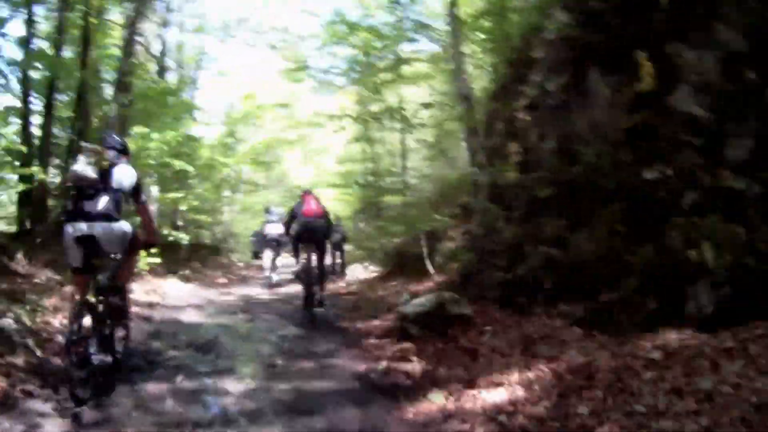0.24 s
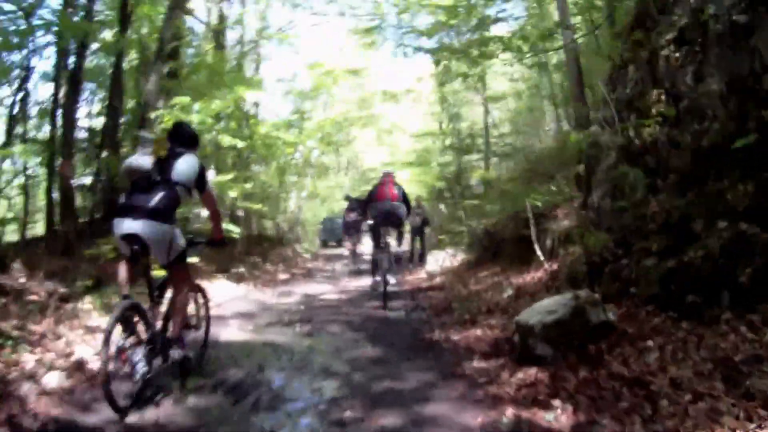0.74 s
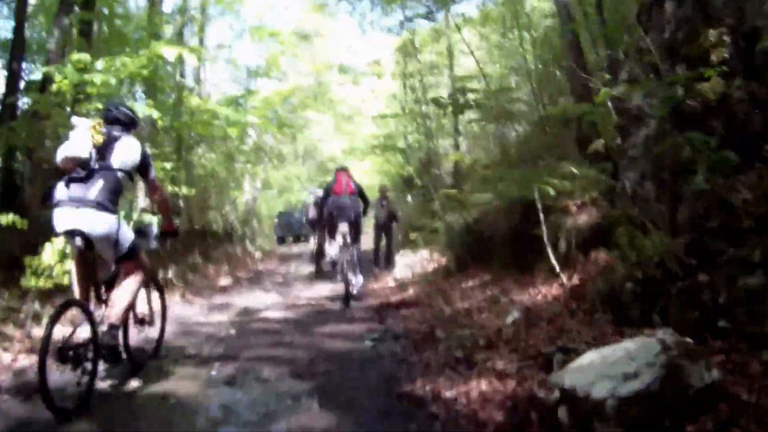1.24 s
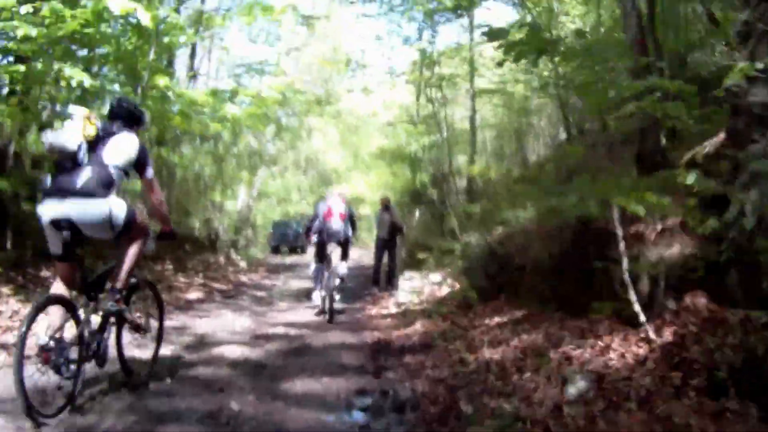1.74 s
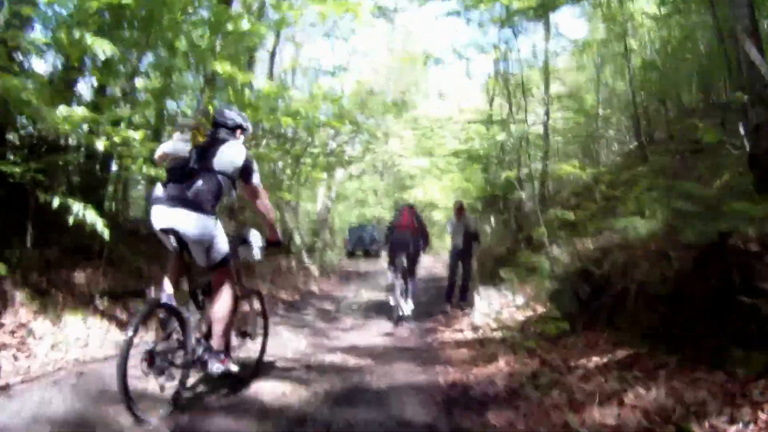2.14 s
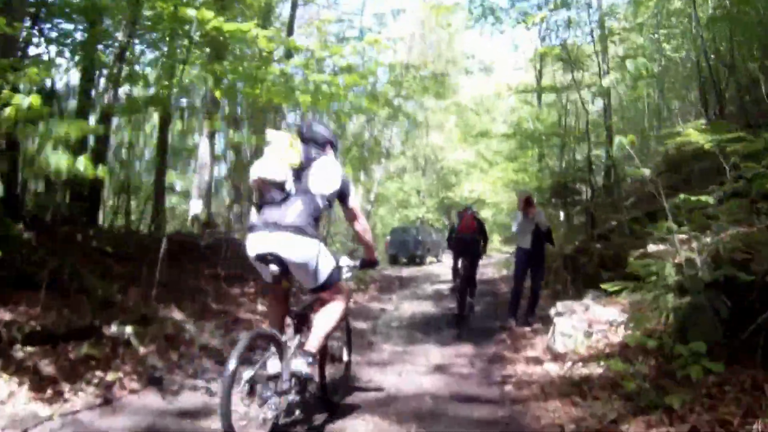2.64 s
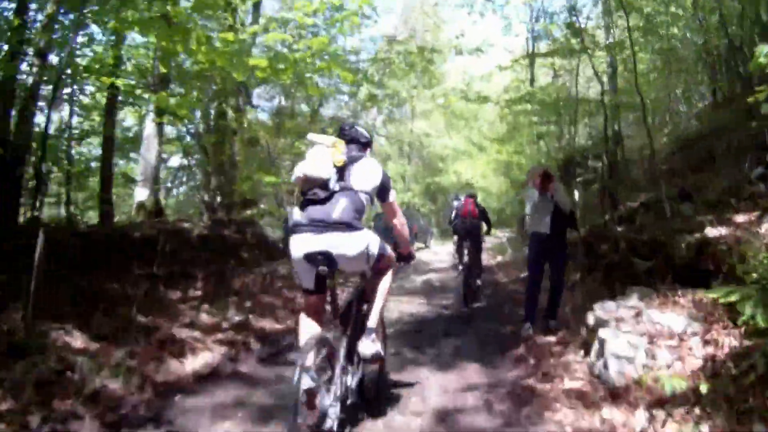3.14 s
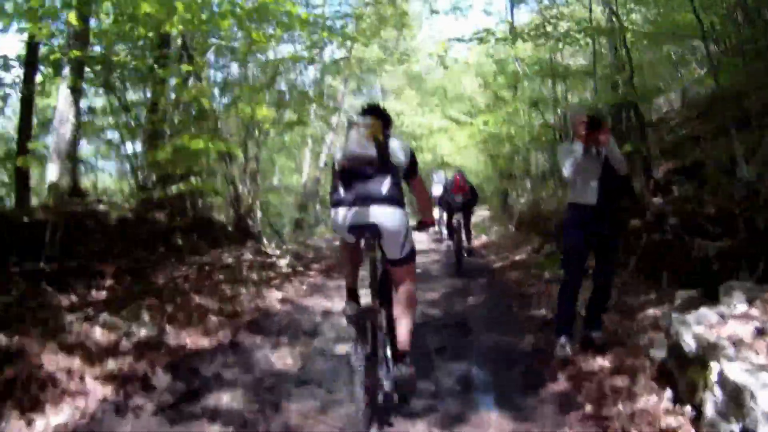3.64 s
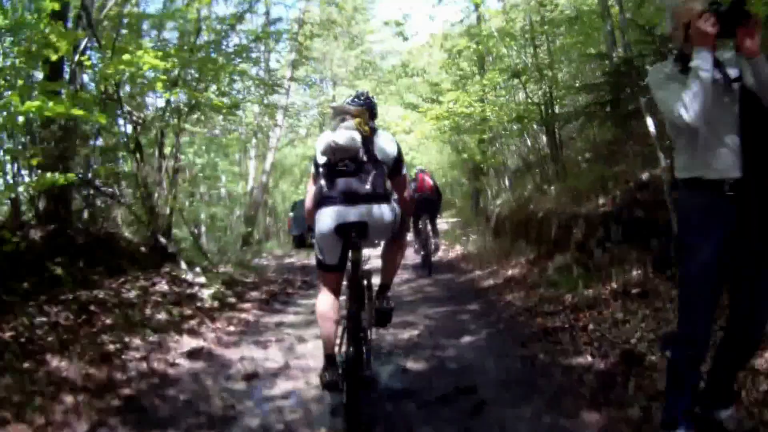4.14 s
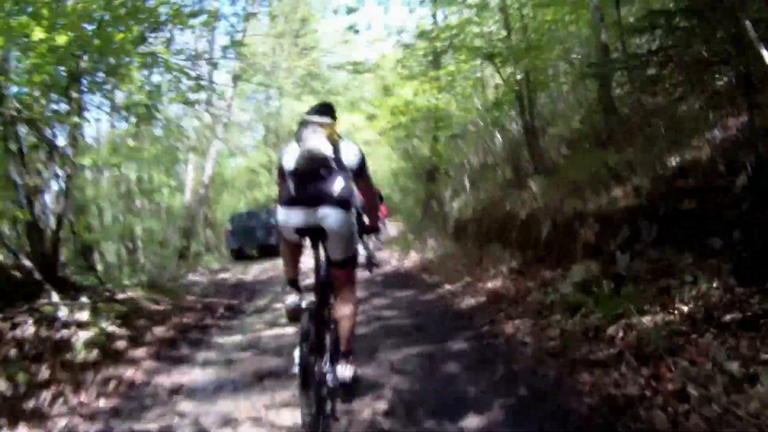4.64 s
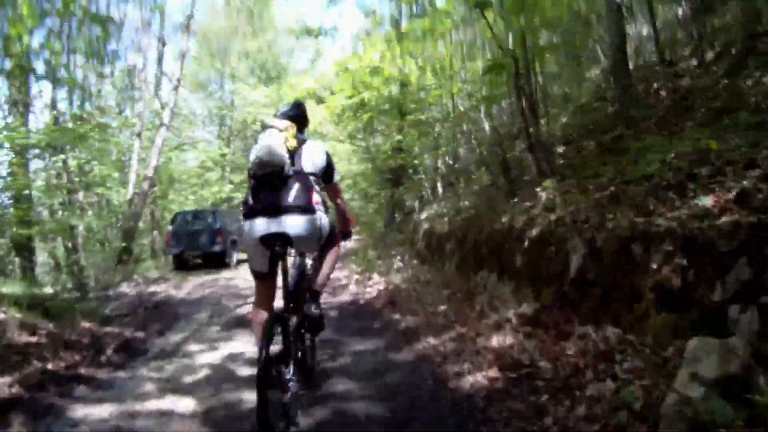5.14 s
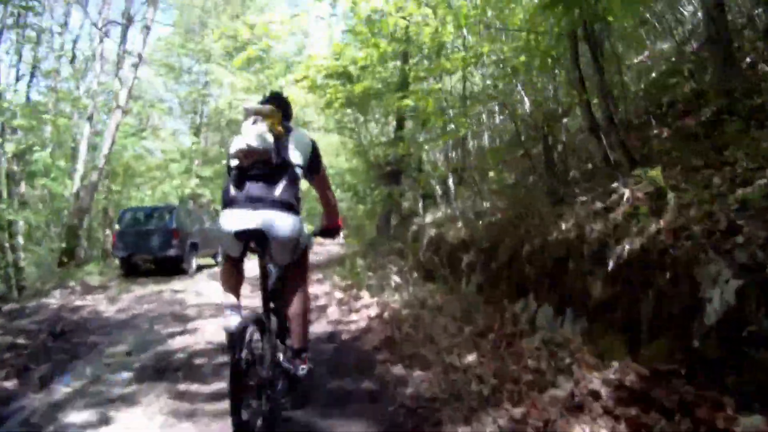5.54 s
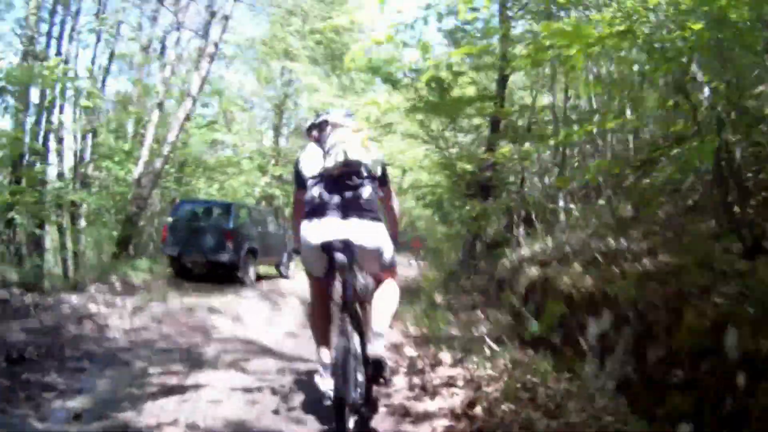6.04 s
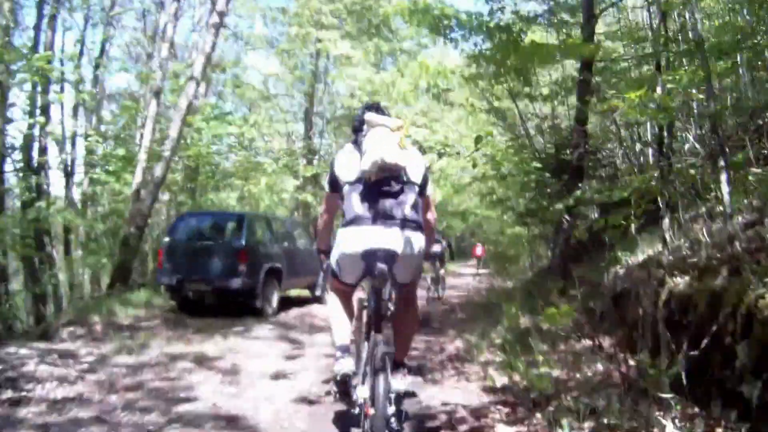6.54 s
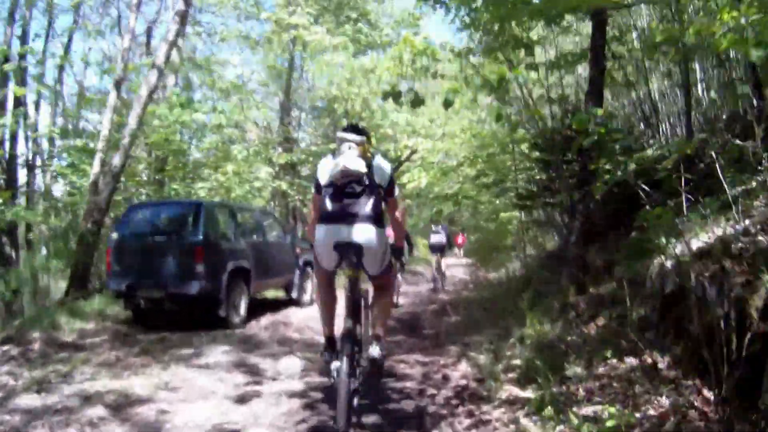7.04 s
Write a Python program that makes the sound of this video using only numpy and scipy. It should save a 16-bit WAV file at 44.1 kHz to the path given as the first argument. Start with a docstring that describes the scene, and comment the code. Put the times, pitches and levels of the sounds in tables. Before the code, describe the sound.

Hard plastic-like knocks and loose rattling from a mountain bike on a stony dirt track, tyres rushing beneath, with a brief late brake groan.

```python
"""Jolts knock and rattle a hard case around a small camera on a mountain bike on a stony forest track.
Each blow is a short burst that rings the case's decaying modes; hard ones add upper modes and a dry tick.
Filtered noise makes the tyre rush on dirt, the frame's low thrum and the air buffeting the case.
Late on, a disc brake groans on wavering partials and squeaks thinly; the loudest peaks clip."""
import sys
import numpy as np
from scipy import signal
from scipy.io import wavfile
from scipy.ndimage import uniform_filter1d

SR = 44100
rng = np.random.default_rng(int(sys.argv[2]) if len(sys.argv) > 2 else 0)


def persist_wave(psi):
    """Save psi, clipped to +-1, as 16-bit WAV."""
    counts = np.round(np.clip(psi, -1, 1) * 32767).astype(np.int16)
    wavfile.write(sys.argv[1], SR, np.atleast_2d(counts).T)


N = 321039
T = np.arange(N) / SR

# Clear knocks on the case, levels before the gains of each layer: (time [s], blow level [dB], pitch [Hz],
# upper modes against the blow [dB], dry tick against the blow [dB])
BLOWS = [(0.0056, -7.5, 1410, -33, -34), (0.0596, -9, 1490, -23, -36), (0.1515, -5, 1200, -27, -28),
         (0.172, -11, 1240, -27, -39.5), (0.2923, -3, 1210, -25, -40), (0.3596, -10, 1070, -27, -39),
         (0.3893, -6.5, 1270, -11, -14), (0.3973, -3.5, 1460, -23, -14), (0.4067, -2.5, 1310, -26, -17),
         (0.418, -9, 1460, -15, -36), (0.448, -15, 1470, 2.5, -29.5), (0.464, -10, 1520, -17, -30),
         (0.5561, -6, 1030, -14.5, -38), (0.5716, 1.5, 1370, -9, -8.5), (0.6063, -2, 1340, -18, -26),
         (0.6298, -5.5, 1440, -7, -34), (0.6484, -1.5, 1250, -8, -15), (0.66, -2.5, 1387, -13.5, -18),
         (0.6683, 2, 1410, -13, -17), (0.7148, -6, 1490, -3, -27), (0.7329, -1, 1360, -9.5, -14),
         (0.752, 1, 1285, -21, -17), (0.8795, -16.5, 1530, 2.5, -25), (0.9452, -10, 1161, -1, -8),
         (0.9595, -1.5, 1250, -18, -24), (1.0144, 2, 1400, -13, -38), (1.033, 2, 1310, -14.5, -10.5),
         (1.0759, 2, 1420, -21, -25), (1.0896, -4, 1480, -23, -18), (1.101, -8, 1429, -18, -28),
         (1.1105, -4, 1355, -15, -16), (1.3083, -9, 1342, -18, -36), (1.3147, -10.5, 1370, -19, -24),
         (1.3805, -2.5, 1530, -18, -42.5), (1.401, 0.5, 1212, -19, -20.5), (1.4878, -9, 1400, -21, -24),
         (1.514, -9, 1160, -31, -39), (1.6189, -2, 1540, -21, -20.5), (1.6863, -5.5, 1560, -30, -42),
         (1.7053, -13, 1200, -31, -37), (1.7266, -3, 1530, -23, -34), (1.794, -3.5, 1550, -34, -47),
         (1.8016, -13, 1250, -30, -34), (1.8088, -15, 1420, -16, -30), (1.8458, -11.5, 1840, -5.5, -13.5),
         (1.972, -14, 1000, -27, -32), (1.991, -10, 1230, -34, -41), (2.0046, -12, 1500, -29, -26),
         (2.0297, -6, 1230, -35, -41), (2.0415, -16, 1604, 5, -35), (2.139, -15.5, 1450, -1, -29),
         (2.237, -7, 1130, -33, -37), (2.267, -11, 1060, -28, -34), (2.3094, -5.5, 1218, -23.5, -21),
         (2.319, -4.5, 1420, -16, -17), (2.39, -3, 1140, -32, -40), (2.3995, -6.5, 1300, -23, -39),
         (2.4388, -10, 1256, -27, -28), (2.4481, -8, 1490, -19, -32), (2.4588, -9, 1240, -13, -22),
         (2.4921, -4.5, 1334, -29, -40), (2.6361, -8, 1020, -27, -36), (2.645, 0, 1180, -23, -43),
         (2.6608, -9, 1500, -10, -27), (2.694, -4, 1410, -7, -32), (2.7102, -3.5, 1588, -13, -26),
         (2.7562, -2.5, 1376, -18, -22), (2.7674, 1.5, 1201, -17.5, -15.5), (2.7772, -5.5, 1416, -21, -22),
         (2.8017, -3.5, 1350, -16.5, -18), (2.9386, -4.5, 1557, -31, -44), (3.0153, -6, 1540, -33, -40),
         (3.074, -3.5, 1340, -26, -34.5), (3.0871, -5.5, 1560, -15, -22.5), (3.0995, 1.5, 1210, -13, -15.5),
         (3.108, -9, 1500, -16, -29), (3.117, -8.5, 1480, -20, -27), (3.125, -3.5, 1280, -22, -22),
         (3.1451, -4, 1630, 2, -17), (3.1519, -4, 1680, -25, -36), (3.2075, -11.5, 1470, -3, -26),
         (3.2149, 2, 1540, -18, -15), (3.2294, -8, 1550, -15, -28), (3.2587, -11, 1043, -27, -34),
         (3.2925, 2, 1560, -28, -15.5), (3.3001, -12, 1464, -28, -34), (3.3605, -2.5, 1530, -29, -21),
         (3.424, 2, 1600, -33, -26), (3.4916, -13.5, 1460, 2, -22), (3.5455, -4, 1360, -9, -12),
         (3.5546, 2, 1310, -11.5, -16.5), (3.5658, 1, 1520, -7, -13), (3.5813, 1.5, 1130, -15.5, -19),
         (3.5906, -7, 1270, -27, -36), (3.602, 1, 1440, -4.5, -15), (3.6349, -7, 1189, -33, -38),
         (3.6477, -4.5, 1350, -19, -26.5), (3.6746, -2, 1340, -12.5, -12), (3.699, -1.5, 1375, -17, -17.5),
         (3.8558, -3.5, 1030, -31, -34), (3.8747, -3.5, 1410, -10.5, -12), (3.935, 2.5, 1450, -19, -12.5),
         (3.9985, -6, 1200, -5.5, -31), (4.0048, -1.5, 1379, -24, -38), (4.028, -4, 1310, -30, -23),
         (4.0414, 0, 1250, -32, -41), (4.052, -3, 1250, -33, -21), (4.0692, -2, 1340, -21, -16),
         (4.108, 2, 1570, -13, -12), (4.1855, -1.5, 1610, -3, -12), (4.196, -0.5, 1330, -23, -18),
         (4.2496, 2, 1560, -8, -15), (4.2837, -2.5, 1415, -21, -28), (4.2922, -2, 1330, -10, -15),
         (4.3199, -4, 1360, -12, -13), (4.3557, -2, 1166, -14, -20), (4.4619, 1, 1350, -17, -15),
         (4.5245, 2, 1510, -32, -12), (4.5644, 2, 1410, -15.5, -9), (4.5884, -0.5, 1460, -13, -16),
         (4.6127, 2, 1580, -14, -6), (4.682, 2, 1471, -17, -18.5), (4.7345, -5, 1560, -29, -32),
         (4.7476, -4, 1582, -42, -36), (4.8221, -2, 1470, -39, -33), (4.831, -3, 1110, -25, -30),
         (4.843, -4.5, 1370, -29, -22), (4.8684, 0, 1260, -12.5, -15), (4.8753, 0.5, 1340, -31, -24),
         (4.885, -6, 1320, -14, -29), (4.893, -3.5, 1332, -15, -15), (4.914, -0.5, 1723, -15, -16),
         (4.9251, 2, 1370, -13.5, -7), (4.974, -6, 1410, -1, -31), (5.0106, -1.5, 1440, -24, -24),
         (5.023, -3.5, 1310, -20, -14), (5.0315, -2.5, 1520, -15, -20), (5.0415, -6, 1250, -13, -37),
         (5.0712, -12.5, 1510, 2, -32), (5.188, -6, 1250, -26, -33), (5.2005, -7, 1040, -24, -32),
         (5.2107, -8, 1240, -30, -39), (5.2289, -2.5, 1370, -13, -35), (5.2362, -2, 1240, -20, -13.5),
         (5.2445, -0.5, 1240, -18, -18), (5.2584, -2, 1330, -10, -16), (5.2815, -3.5, 1420, -15, -26),
         (5.3102, -6, 1350, -18, -29), (5.3771, -7, 1300, -31, -35), (5.404, -2.5, 1810, -15, -18),
         (5.4149, -5, 1220, -27, -30.5), (5.4831, -2.5, 1540, -18, -34), (5.5574, -4.5, 1180, -33, -39),
         (5.568, -0.5, 1140, -37, -22), (5.5776, -4.5, 1230, -32, -39), (5.6181, -4.5, 1200, -34, -36),
         (5.71, -9, 1590, -32, -33), (5.7383, -11, 1290, -18, -31), (5.773, -7.5, 1260, -7, -32),
         (5.8114, -2, 1350, -20, -20), (5.8386, -12, 1290, -14, -28), (5.9388, -11.5, 1312, -5, -27),
         (5.9928, -9, 1180, -16, -34), (6.0062, -10, 1060, -27, -30), (6.0158, -11, 1270, -18, -29),
         (6.0334, -14.5, 1770, 3, -24), (6.0436, -9, 1404, -31, -31), (6.056, -8, 1290, -25, -35),
         (6.132, -17, 1811, 2.5, -24), (6.1474, -3.5, 1360, -14, -17), (6.2156, -4.5, 1500, -6, -20.5),
         (6.2559, -2.5, 1250, -23, -17), (6.392, -5, 1250, -32, -29), (6.4909, -4, 1380, -26, -37),
         (6.5187, -3, 1420, -29, -33), (6.5322, -2, 1410, -22, -24), (6.5418, -0.5, 1400, -14, -15),
         (6.5526, -3, 1300, -25, -18), (6.606, -6.5, 1280, -30, -28), (6.8082, -7, 1190, -20, -29),
         (6.8808, -9, 1300, -15, -28), (7.0114, -9, 1200, -22, -28), (7.1782, -1.5, 1720, -17, -28),
         (7.2367, -9, 1370, -4, -30), (7.2785, -6.5, 1230, -18, -26.5)]
# Roughness of the track, before layer gains: (time [s], loose rattle level [dB], frame thrum level [dB])
ROUGHNESS = [(0.0, -25.5, -45.5), (0.34, -25, -42), (0.59, -19, -39), (1.92, -28.5, -46),
             (2.35, -24.5, -44), (2.45, -25.5, -45), (3.65, -24, -42.5), (4.11, -18, -42),
             (4.4, -17.5, -43), (4.8, -22, -39), (5.45, -21.5, -45.5), (5.82, -30, -41.5),
             (6.04, -27, -42.5), (6.2, -21.5, -38.5), (6.45, -22.5, -43), (6.61, -26.5, -43.5),
             (6.93, -23, -46), (7.28, -27, -43)]


def undb(db):
    """Decibels to amplitude."""
    return 10 ** (np.asarray(db) / 20)


def level(x, db):
    """Scale a sound to an RMS level in dB."""
    return x * undb(db) / np.sqrt(np.mean(x ** 2))


def column(table, index):
    """One column joined by straight lines in time."""
    rows = np.array(table)
    return np.interp(T, rows[:, 0], rows[:, index])


def band(x, hz, width):
    """Resonant band-pass, gain 1 at the centre."""
    b, a = signal.iirpeak(min(hz, 0.45 * SR), hz / width, fs=SR)
    return signal.lfilter(b, a, x)


def double_band(x, hz, width):
    """The same resonance twice, for steeper skirts."""
    return band(band(x, hz, width), hz, width)


def walk(rate):
    """Random levels held 1 / rate s and slewed twice; spread near 1."""
    hold = int(SR / rate)
    steps = np.repeat(rng.standard_normal(N // hold + 1), hold)
    return 1.25 * uniform_filter1d(uniform_filter1d(steps, hold), hold)[:N]


def spikes(s, size):
    """Impulses of the given sizes at the given times."""
    size = np.asarray(size)
    out = np.zeros(N, dtype=size.dtype)
    inside = (s >= 0) & (s * SR < N)
    np.add.at(out, (s * SR).astype(int)[inside], size[inside])
    return out


def decay(x, tau_s):
    """Each impulse dies away exponentially with time constant tau_s."""
    return signal.lfilter([1], [1, -np.exp(-1 / (tau_s * SR))], x)


def burst(s, db, hz, width_s):
    """The contact itself: a few cycles at the blow's own pitch, swelling and fading around time s."""
    t = np.arange(-400, 401) / SR
    swell = np.exp(-0.5 * (t / width_s) ** 2)
    start_turn = rng.random((len(s), 1))
    waves = undb(db)[:, None] * swell * np.sin(2 * np.pi * (np.outer(hz, t) + start_turn))
    out = np.zeros(N + len(t))
    np.add.at(out, np.add.outer(np.rint(s * SR).astype(int), np.arange(len(t))), waves)
    return out[len(t) // 2:][:N]


def ring(s, size, hz, t60, contact_s):
    """One decaying mode struck at times s; the push dies away over contact_s, so the ring builds up."""
    pole = np.exp(2j * np.pi * hz / SR - np.log(1000) / (t60 * SR))
    push = np.exp(2j * np.pi * hz / SR - 1 / (contact_s * SR))
    feedback = np.convolve([1, -pole], [1, -push])
    return signal.lfilter([1 - abs(push)], feedback, spikes(s, size)).imag


def case(s, db, hz, hard_db, tick_db, width_s):
    """Each blow rings the modes near its own pitch most; hard blows add the upper modes and a dry tick."""
    # main modes of the case: (frequency [Hz], relative weight [dB], 60 dB decay [s])
    main_modes = [(666, -4, 0.12), (771, 4.5, 0.027), (908, 1, 0.045), (962, -9, 0.02),
                  (1182.4, 1.5, 0.071), (1310.7, -4, 0.072), (1446, -11, 0.13), (1750, 1.5, 0.049),
                  (1932, 9, 0.019), (2218, 10, 0.022)]
    # upper modes, same columns: (frequency [Hz], relative weight [dB], 60 dB decay [s])
    upper_modes = [(2690, -3, 0.01), (2923, -5, 0.018), (3227, 1, 0.0063), (3412, -2, 0.011),
                   (3542, -4, 0.024), (4560, -23, 0.0036)]
    slope_db, scatter_db = 24, 5.0  # loss per octave away from the blow's pitch; chance spread per mode
    main_gain_db, upper_gain_db, tick_gain_db = -6, -4, 3

    chance = rng.standard_normal((len(s), len(main_modes) + len(upper_modes)))
    turn = np.exp(1.2j * rng.standard_normal(chance.shape))  # random starting phase
    modes = np.array(main_modes)
    octaves_off = abs(np.log2(modes[:, 0] / hz[:, None]))
    share = undb(modes[:, 1] - slope_db * octaves_off + scatter_db * chance[:, :len(main_modes)])
    share = share / np.linalg.norm(share, axis=1, keepdims=True)  # the modes divide the blow's energy

    out = burst(s, db - 2.0, hz, width_s)
    for k, (mode_hz, _, t60) in enumerate(main_modes):
        size = undb(db + main_gain_db) * share[:, k] * turn[:, k]
        out = out + ring(s - width_s, size, mode_hz, t60, 0.33 * width_s)
    for k, (mode_hz, mode_db, t60) in enumerate(upper_modes, len(main_modes)):
        hit_db = db + hard_db + upper_gain_db + mode_db + scatter_db * chance[:, k]
        out = out + ring(s - 0.0008, undb(hit_db) * turn[:, k], mode_hz, t60, 0.00029)

    # the tick is a short fall of random-sign noise
    tick_shape = decay(spikes(s - 0.0004, undb(db + tick_db + tick_gain_db)), 0.0013)
    tick = tick_shape * np.sign(rng.standard_normal(N))
    return out + band(band(tick, 3470, 3130), 3800, 6800)


def knocks():
    """The clear blows, short and hard, strike the case at their set times."""
    return case(*np.transpose(BLOWS), width_s=0.000946)


def rattle():
    """A loose fit chatters in random clusters of small, softer blows, harder when the track is rough."""
    chance = rng.random((1150, 4)).T  # four draws a blow: time, level, pitch, hardness
    odds = np.cumsum(undb(4.8 * walk(30)))  # blows bunch up where the odds rise fast
    at = np.searchsorted(odds, chance[0] * odds[-1])
    # the play in the fit limits how hard a blow can land
    extra_db = np.minimum(-4.2 * np.log(1 - chance[1]), 8)
    db = column(ROUGHNESS, index=1)[at] + 2.26 + extra_db
    hz = 1220 * 2 ** (0.69 * (chance[2] - 0.5))
    hard_db = -16 + 15 * (chance[3] - 0.5)
    return case(at / SR, db, hz, hard_db, hard_db - 15.5, width_s=0.001472)


def tyres():
    """Third-octave noise bands: the low ones follow the track, the top ones the hiss; each flickers alone."""
    # rise and fall of the tyre hiss, used about its mean: (time [s], level [dB])
    hiss = [(0.0, -64), (0.43, -56.5), (0.61, -56), (1.5, -62), (3.16, -58.5), (4.32, -56), (5.49, -56.5),
            (6.63, -52.5), (7.28, -51)]
    # relative spectrum of the tyres heard through the case: (frequency [Hz], density [dB per Hz])
    rush = [(240, -56), (400, -52), (460, -27.5), (814, -10), (1200, -14), (1460, -4.5), (1630, -31),
            (2250, -21.5), (2470, -2), (3470, -32.5), (4240, -48), (5870, -32.5), (14600, -66.5),
            (16000, -86)]
    rush_hz, density_db = np.array(rush).T
    rough_db, hiss_db = column(ROUGHNESS, index=1), column(hiss, index=1)
    rough_swell_db = 1.2 * (rough_db - rough_db.mean())
    hiss_swell_db = hiss_db - hiss_db.mean()
    out = 0
    for hz in 450 * 2 ** (np.arange(16) / 3):
        hiss_share = np.clip(np.log2(hz / 1500) / 0.74, 0, 1)
        db = np.interp(np.log(hz), np.log(rush_hz), density_db) + 10 * np.log10(hz)  # wider bands hold more
        db = db + (1 - hiss_share) * rough_swell_db + hiss_share * hiss_swell_db
        db = db + (3.5 - 1.5 * hiss_share) * walk(30)  # the hiss is steadier than the rush
        noise = double_band(rng.standard_normal(N), hz, hz / 3)
        out = out + undb(db) * level(noise, 0)
    return level(out, -32)


def frame():
    """Knobs and stones shake the frame's low resonances, which ring on briefly; air buffets the case beneath."""
    # bumps that thud up through the wheels, before layer gains: (time [s], level [dB])
    bumps = [(0.028, -29), (0.394, -28), (0.573, -23), (0.699, -23), (0.954, -22), (1.358, -34),
             (1.605, -29), (2.438, -21.5), (2.724, -30), (3.092, -32), (3.549, -24), (3.659, -29),
             (3.945, -23), (4.05, -21), (4.447, -23), (4.559, -26), (5.017, -25), (5.23, -20), (5.425, -26),
             (5.586, -27), (6.049, -28), (6.251, -25), (6.523, -18.5), (6.82, -24), (6.959, -27)]
    # frame resonances: (frequency [Hz], width [Hz], relative weight [dB])
    resonances = [(171.4, 37, 5.5), (228.8, 83, 1.5), (295.8, 38, -8.5)]
    # air on the case: (frequency [Hz], width [Hz], RMS level [dB])
    buffets = [(40.7, 42, -44), (71.8, 9.6, -52.5)]
    rise_s, fall_s, shake_db = 0.0024, 0.021, -7.5
    spread = 1.56  # each pass is wider, as two passes narrow the band

    bump_s, bump_db = np.transpose(bumps)
    shake = spikes(bump_s, undb(bump_db + shake_db))
    shake = decay(decay(shake, rise_s), fall_s) / (rise_s * SR)
    flicker = undb(2.84 * walk(40))
    road = rng.standard_normal(N) * flicker * (undb(column(ROUGHNESS, index=2)) + shake)
    blow_s, blow_db = np.transpose(BLOWS)[:2]
    signs = np.sign(rng.standard_normal(len(blow_s)))
    road = road + spikes(blow_s, undb(blow_db - 13) * signs)  # each clear knock thuds through too

    thrum, air = 0, 0
    for hz, width, db in resonances:
        thrum = thrum + undb(db) * np.sqrt(SR / width) * double_band(road, hz, spread * width)
    for hz, width, db in buffets:
        air = air + level(double_band(rng.standard_normal(N), hz, spread * width), db)
    return undb(-8.5) * thrum + air


def groan():
    """Pads stick and slip on the disc: rough partials and a rasp swell, hold and fade; pitch rises with grip."""
    peak_s, hold_s, rise_db_s, fall_db_s = 6.51, 0.11, 110, 70
    peak_hz, sag_hz_per_db = 795, 0.5
    low_db, octave_db = -17.5, -17
    rise_db = np.minimum(rise_db_s * (T - peak_s), 0)
    grip_db = rise_db - fall_db_s * np.maximum(T - peak_s - hold_s, 0)
    hz = peak_hz + sag_hz_per_db * np.maximum(grip_db, -60)
    phase = 2 * np.pi * np.cumsum(hz * (1 + 0.016 * walk(200))) / SR
    low = undb(grip_db + low_db + 1.8 * walk(60))
    high = undb(grip_db + octave_db + 2.4 * walk(60))
    # uneven grip spreads the two main partials into noisy skirts
    out = low * (1 + 0.61 * walk(160)) * np.sin(phase)
    out = out + high * (1 + 0.46 * walk(250)) * np.sin(2 * phase)
    out = out + high * undb(-21) * np.sin(3 * phase)
    rasp = level(band(band(rng.standard_normal(N), 1220, 1060), 1200, 1050), -6.5)
    out = out + high * rasp * undb(3.4 * walk(120))
    # a low-pass keeps the groan dull, without hiss above its partials
    return signal.sosfilt(signal.butter(4, 2600, fs=SR, output="sos"), out)


def squeaks():
    """A bent spot on the disc passes the pads: each pass is a thin, wavering sine that swells and fades."""
    # brake squeaks, level before the swell: (start [s], length [s], level [dB], frequency [Hz])
    passes = [(6.305, 0.054, -52, 11013), (6.393, 0.057, -46, 10995), (6.493, 0.072, -49, 11007),
              (6.589, 0.063, -43, 10972), (6.707, 0.044, -45, 10922)]
    wavering_samples = np.cumsum(1 + 0.0055 * walk(300))
    flutter_db = 2.6 * walk(150)
    out = 0
    for start, length, db, hz in passes:
        place = (T - start) / length  # 0 at the start, 1 at the end
        swell_db = np.interp(place, (0, 0.36, 1), (-7, 6, -14))
        sounding = (place > 0) * (place < 1)
        tone = np.sin(2 * np.pi * hz * wavering_samples / SR)
        out = out + sounding * undb(db + swell_db + flutter_db) * tone
    return out


def scene():
    """All layers together, in one channel."""
    return (knocks() + rattle() + tyres() + frame() + groan() + squeaks())[None]


def record(dry):
    """The input stage clips hard just below full scale; then the deepest bass and the top are cut."""
    low_cut_hz, top_hz = 30, 15700
    clipped = np.clip(dry, -0.97, 0.97)
    no_bass = signal.sosfilt(signal.butter(2, low_cut_hz, "high", fs=SR, output="sos"), clipped)
    return signal.sosfilt(signal.ellip(10, 0.2, 90, top_hz, fs=SR, output="sos"), no_bass)


dry = scene()
out = record(dry)
persist_wave(out)
```